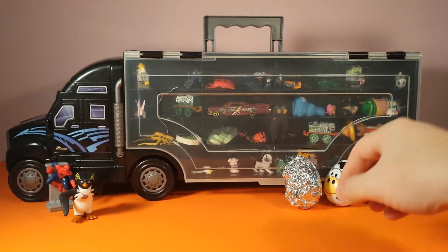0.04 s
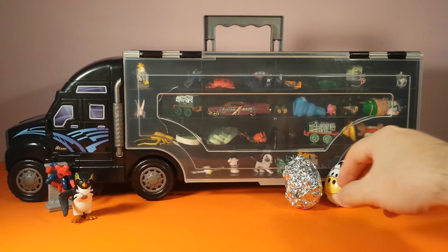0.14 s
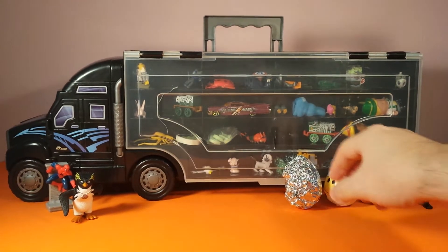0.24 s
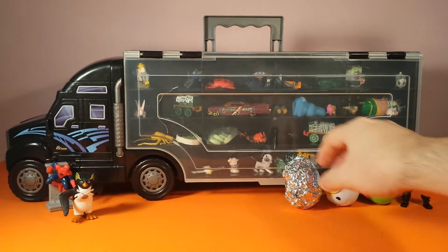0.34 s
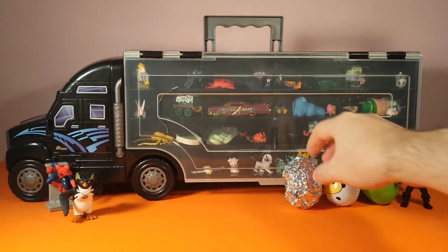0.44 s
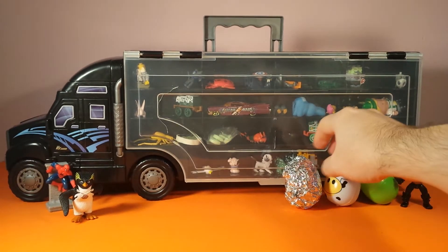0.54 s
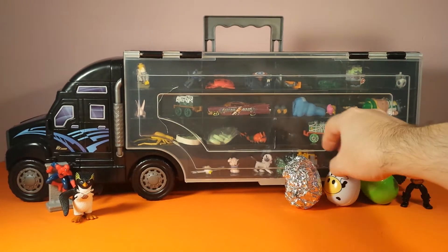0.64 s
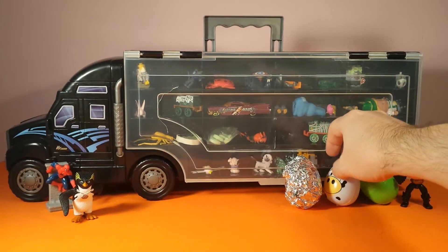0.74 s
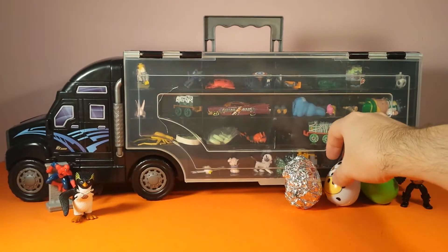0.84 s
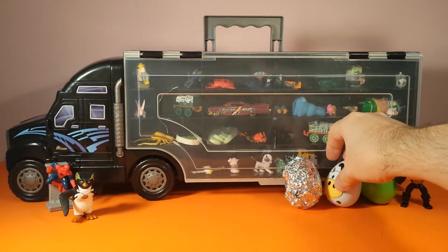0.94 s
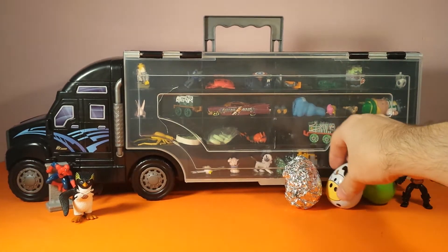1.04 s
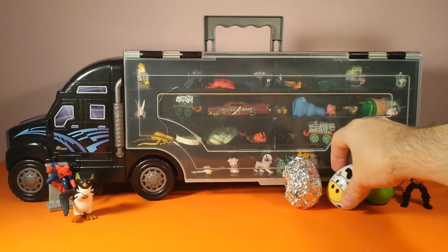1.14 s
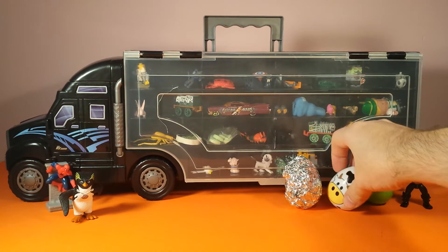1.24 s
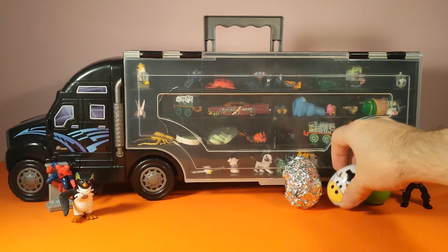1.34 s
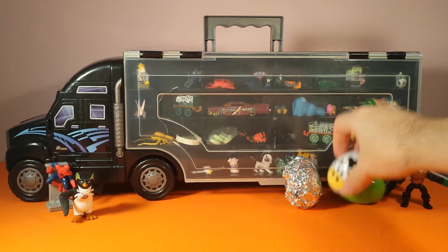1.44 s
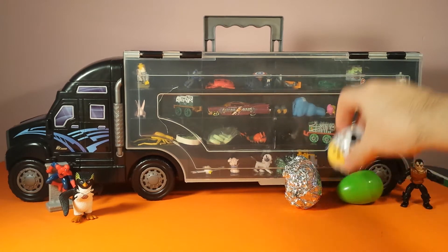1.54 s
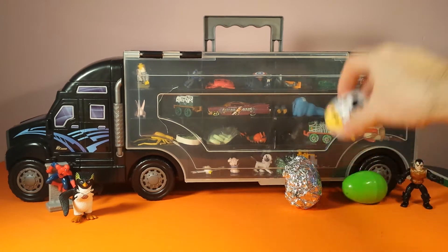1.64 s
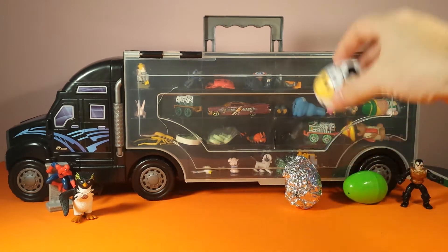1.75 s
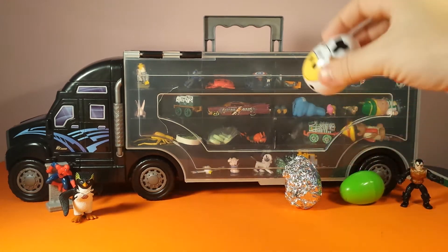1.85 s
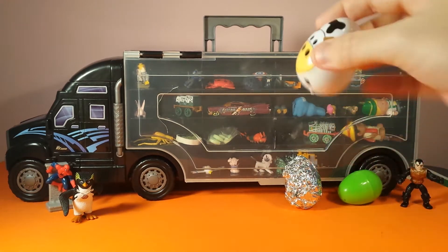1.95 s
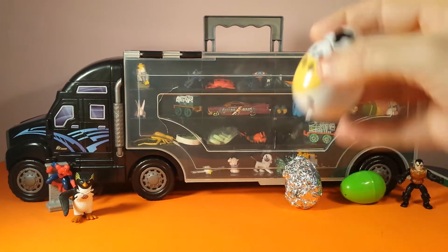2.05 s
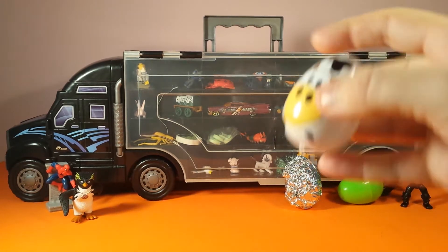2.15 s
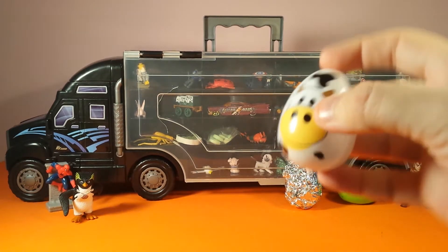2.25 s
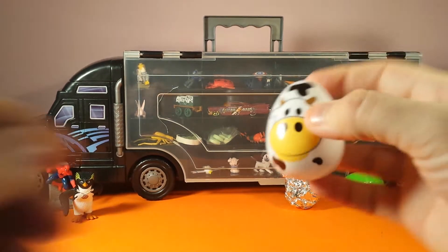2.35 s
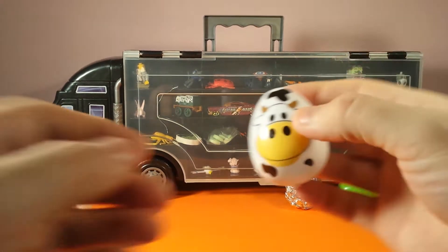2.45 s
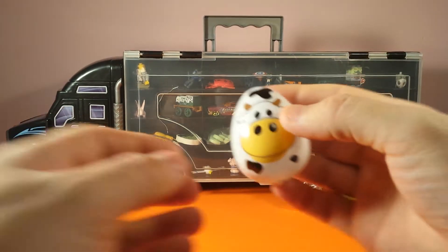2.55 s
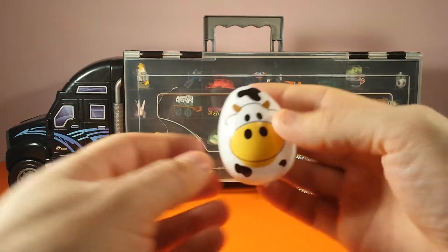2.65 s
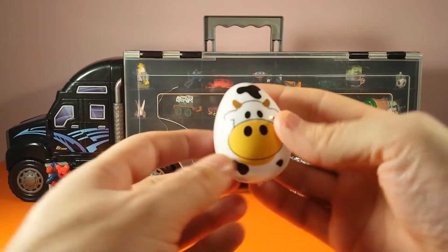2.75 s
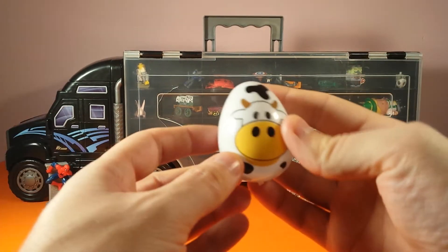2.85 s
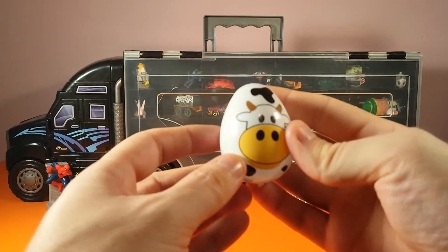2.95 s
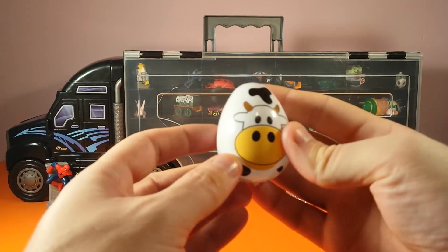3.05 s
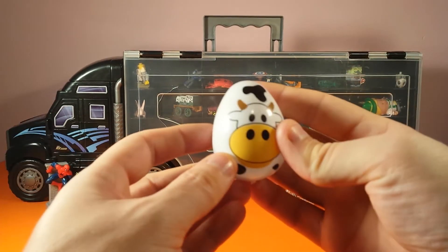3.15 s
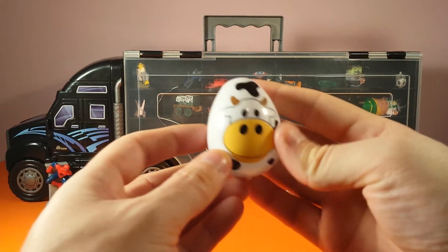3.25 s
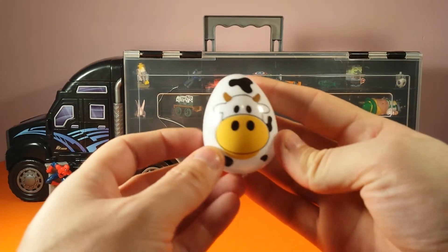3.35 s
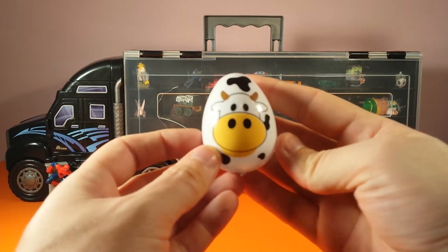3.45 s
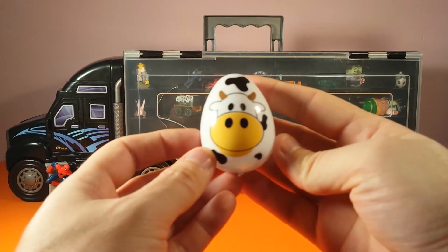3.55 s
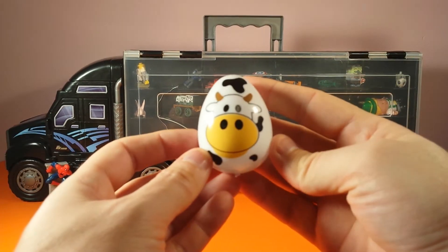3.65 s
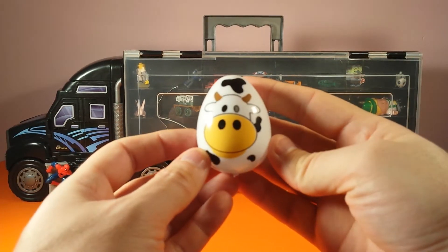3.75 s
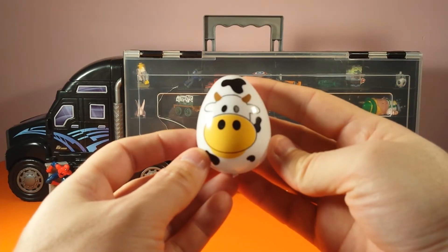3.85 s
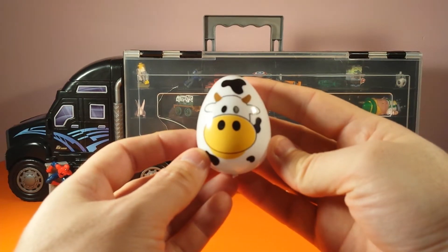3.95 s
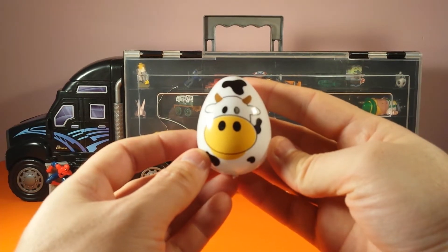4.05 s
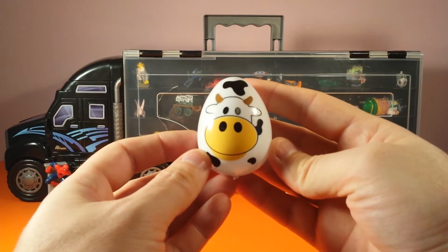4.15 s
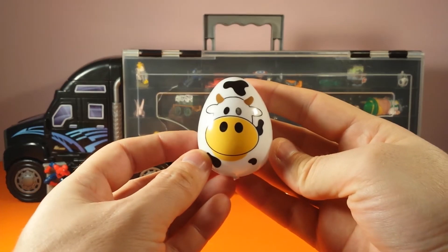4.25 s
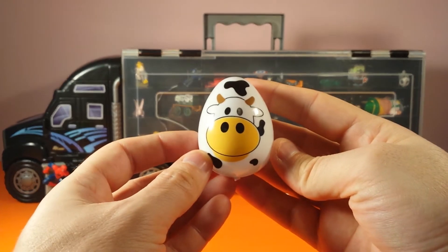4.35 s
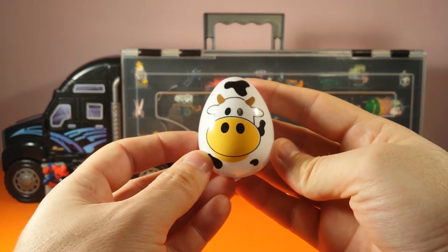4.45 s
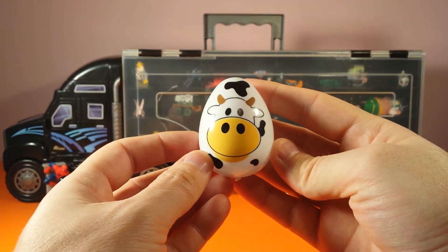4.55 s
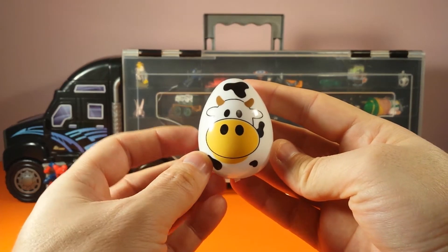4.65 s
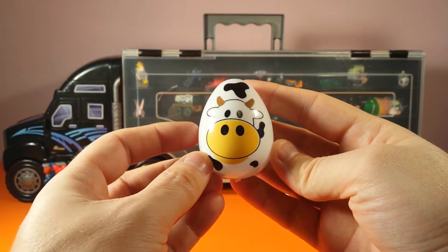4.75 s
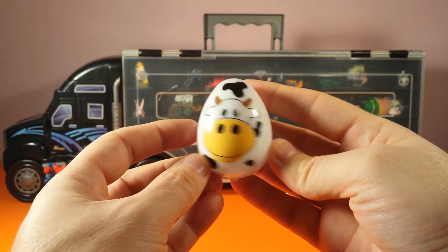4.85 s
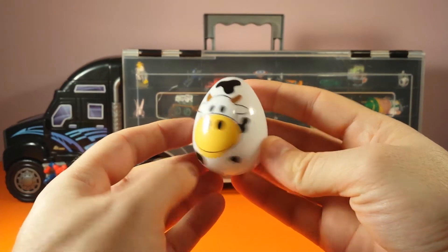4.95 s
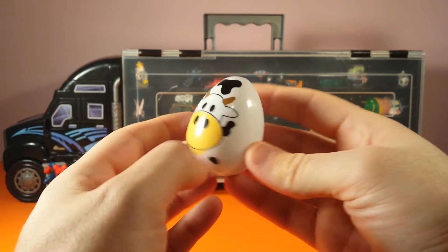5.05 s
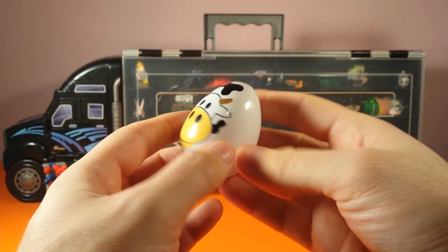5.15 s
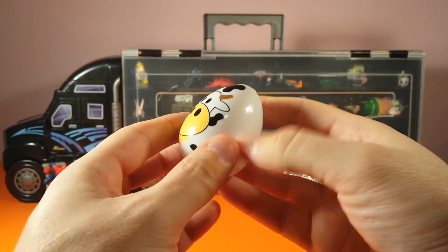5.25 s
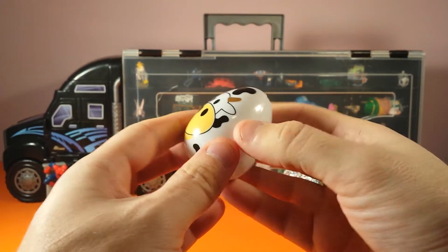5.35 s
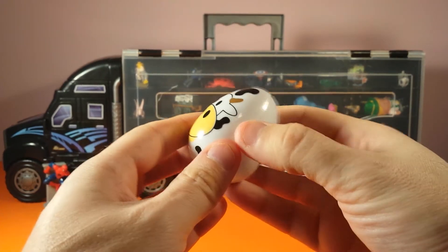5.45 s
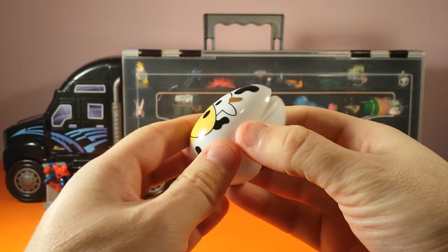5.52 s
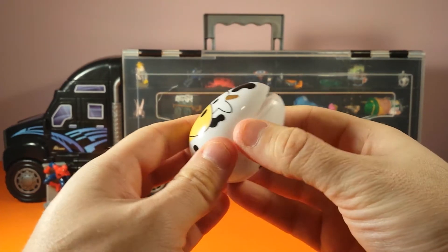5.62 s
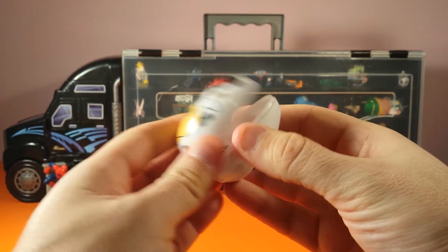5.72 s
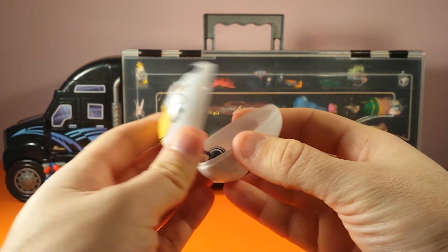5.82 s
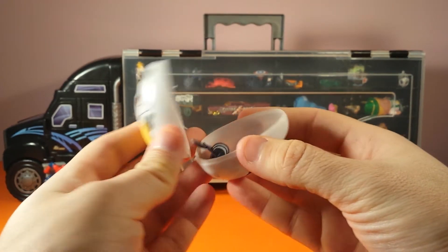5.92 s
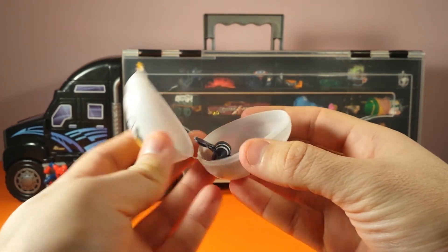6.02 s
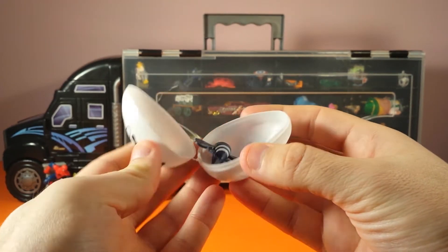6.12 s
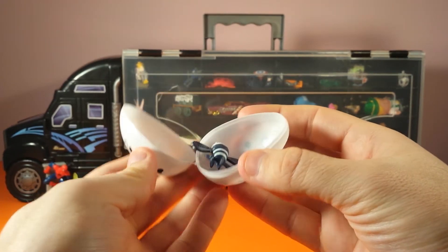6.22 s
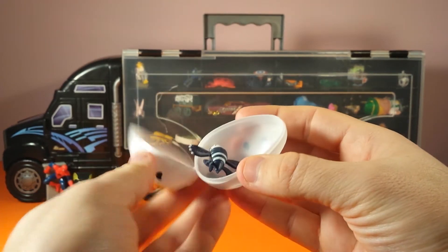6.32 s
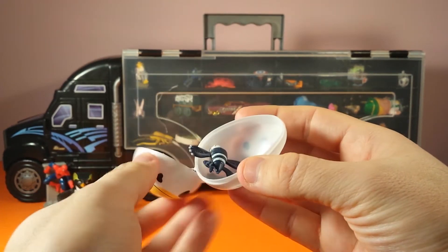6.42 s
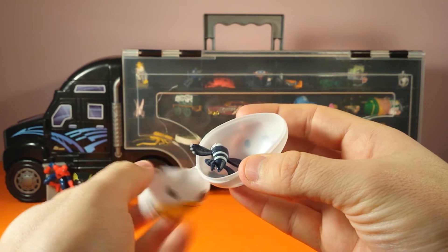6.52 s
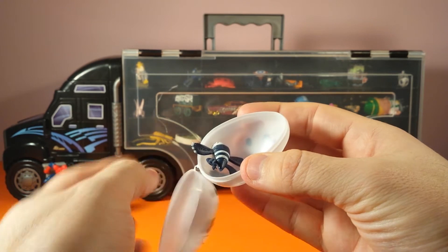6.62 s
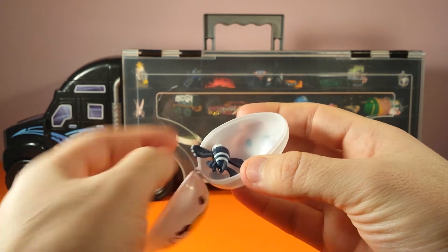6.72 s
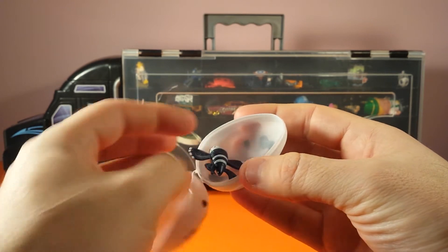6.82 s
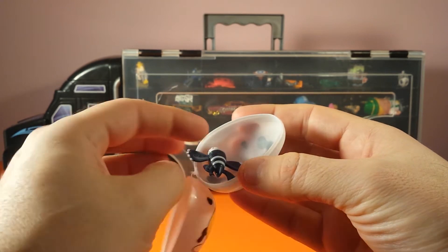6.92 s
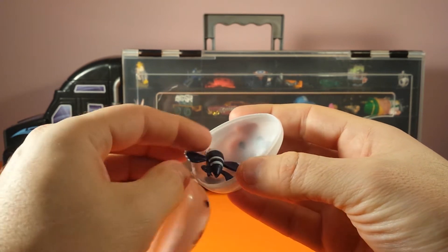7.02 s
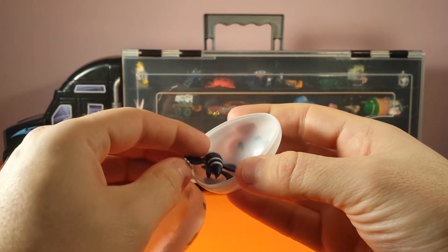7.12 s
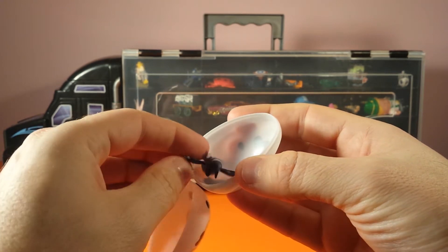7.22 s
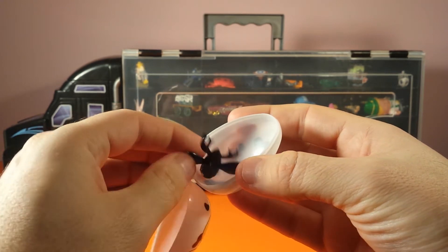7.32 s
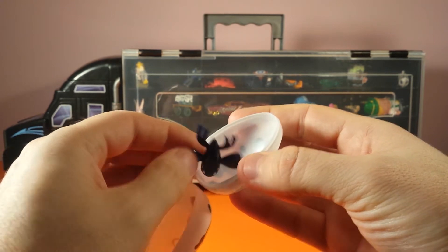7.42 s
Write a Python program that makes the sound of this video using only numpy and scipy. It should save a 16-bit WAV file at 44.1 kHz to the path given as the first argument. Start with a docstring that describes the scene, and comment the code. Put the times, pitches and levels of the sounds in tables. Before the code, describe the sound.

A plastic toy egg brushes crackly foil, clacks softly in the fingers, pops open with one crisp snap, scrapes apart and is gently rummaged.

```python
"""A plastic toy egg is picked up and opened by hand in a small quiet room, close to a stereo camera.
It scrapes past a foil-wrapped egg, knocks dully as the toy moves inside, and fingers rub and tick on it.
The catch snaps, the halves scrape apart with a rising chirp of trapped air, and the toy is fingered.
Friction is coloured noise grains and struck parts are dying sines; room tail, rumble, hiss and hum lie under."""
import sys
import numpy as np
from scipy import signal
from scipy.fft import rfft, irfft
from scipy.io import wavfile

SR = 44100
rng = np.random.default_rng(int(sys.argv[2]) if len(sys.argv) > 2 else 0)


def transcribe(signal):
    """Save signal, clipped to [-1, 1], as a 16-bit WAV file at the path in sys.argv[1]."""
    frames = np.atleast_2d(signal).T
    limited = np.clip(frames, -1, 1)
    pcm = np.round(limited * 32767).astype(np.int16)
    wavfile.write(sys.argv[1], SR, pcm)


N = 329868

# Levels are relative, ahead of placement and ports. A fall is the time to drop by a factor e.
# The catch letting go in quick slips: [t/s, level/dB]
CATCH_SLIPS = [(5.5368, -34.5), (5.5391, -14), (5.5400, -13), (5.5409, -19), (5.544, -23.5)]
# Colour of the catch's crunch: [f/Hz, level/dB]
CRACK_COLOUR = [(700, -22.5), (1500, -7.5), (2200, -7.5), (3200, -13), (4400, -10.5), (5400, 3),
                (6700, 2.5), (7900, -5.5), (9200, -4), (11500, -12), (13000, -18), (15800, -25)]
# Rim modes rung by the catch: [f/Hz, level/dB, t60/s]
CATCH_MODES = [(2100, -12, 0.0045), (4100, -18, 0.0045), (5010, -10.5, 0.0052), (5330, -4.5, 0.006),
               (6000, -5.5, .009), (6510, -3, .008), (7350, -3.5, .007), (8300, -9, .007),
               (9100, -5.5, .007), (10240, -7, .006), (11500, -10, .005), (15000, -20.5, .006)]
# The pop's start, s
POP_AT = 5.5392
# The shell's walls in the pop: [f/Hz, level/dB, t60/s]
POP_WALL_MODES = [(480, -7.5, .01), (720, -10.5, 0.016), (1148, -15.5, 0.0097), (1400, -20, 0.0086),
                  (1720, -18.5, .011)]
# The air in the egg in the pop: [f/Hz, level/dB, t60/s]
POP_AIR_MODES = [(282, -3, .014)]
# The rims scraping as the halves part: [peak t/s, level/dB, fall/s]
RIM_STROKES = [(5.752, -53.5, 0.064), (5.781, -33, 0.0077), (5.7875, -30, 0.0013), (5.795, -42, 0.022),
               (5.8052, -29, .0013), (5.8087, -24.5, 0.0013), (5.83, -58, 0.025)]
# Colour of the scraping rims: [f/Hz, level/dB]
RIM_COLOUR = [(1470, -77), (2500, -51), (2960, -17.5), (4170, -9.5), (5200, -3), (5660, -0.5), (7980, 2),
              (11400, -18), (13700, -13), (15500, -23)]
# The air between the opening halves: [t/s, resonance f/Hz, level/dB]
GAP_PATH = [(5.73, 890, -81), (5.76, 1240, -58), (5.778, 1330, -40), (5.784, 1365, -37),
            (5.789, 1620, -35.5), (5.801, 2010, -47.5), (5.812, 1920, -50), (5.82, 2100, -71)]
# Dull knocks of toy and fingers on the shell: [t/s, level/dB, pitch f/Hz, upper modes level/dB]
KNOCKS = [(.730, -52, 560, 2), (0.783, -47.5, 570, 1.5), (.932, -62, 574, -12), (1.011, -67, 560, -10),
          (1.071, -48.5, 507, -3.5), (1.3777, -43, 583, -2), (1.401, -48, 537, -14),
          (1.4294, -50.5, 580, 6), (1.449, -51.5, 570, -5), (1.473, -50.5, 583, 8), (1.49, -57, 506, 8),
          (1.5349, -44.5, 603, 7.5), (1.543, -47, 583, -11), (1.571, -73, 580, 7), (2.0008, -46, 577, 7.5),
          (2.497, -48, 602, -2.5), (2.711, -58.5, 668, 4.5), (2.914, -57.5, 535, 1), (3.075, -60, 570, -12),
          (3.173, -58, 485, 0), (3.236, -58.5, 440, 2), (5.377, -69, 631, -9), (6.3288, -47.5, 530, 1)]
# Shell modes of a knock: [ratio to the pitch, level/dB, t60/s]
KNOCK_MODES = [(.55, -4.5, 0.025), (.86, -3, 0.042), (1.03, -0.5, 0.041), (1.2, -5, 0.026),
               (1.65, -8.5, 0.0185), (2.1, -10.5, 0.0167), (3.2, -32, 0.025)]
# Soft bumps of the hand: [t/s, level/dB, f/Hz, t60/s]
BUMPS = [(1.602, -46.5, 76, 0.076), (1.663, -61, 110, 0.13), (5.712, -47, 114.8, 0.025),
         (6.33, -41, 226, 0.061), (6.388, -61, 280, 0.04)]
# Sharp ticks of nail and seam: [t/s, level/dB, fall/s]
TICKS = [(.7832, -36, 0.00056), (1.067, -52.5, 0.0019), (1.309, -54, .004), (1.38, -54, 0.0019),
         (1.422, -49.5, .0043), (3.1535, -54, 0.0024), (3.289, -46, 0.00087), (4.9737, -48.5, 0.0021),
         (5.7208, -37, 0.00085), (6.2802, -52, 0.001), (6.6035, -51.5, 0.0041), (6.6478, -52.5, 0.0036),
         (6.7195, -32.5, 0.00085)]
# Colour of the ticks: [f/Hz, level/dB]
TICK_COLOUR = [(880, -51), (1500, -41), (2640, -24), (3120, -3), (3580, -10), (4800, 4), (6500, 12.5),
               (9890, -6.5), (13500, 0), (15500, -23)]
# Ticks where the shell is free to ring: [t/s, level/dB, pitch f/Hz]
PINGS = [(3.1512, -41.5, 5760), (4.9737, -54, 4760)]
# Modes of the freely ringing shell: [ratio to the pitch, level/dB, t60/s]
PING_MODES = [(0.688, -22, 0.045), (.91, -2.5, 0.014), (.99, -3.5, 0.054), (1.02, -4, 0.044),
              (1.63, -10.5, 0.031)]
# How much the grip is shifting; it drives murmur, hiss and camera shake: [t/s, level/dB]
GRIP = [(0, -67), (.45, -64), (.6, -78), (1.3, -73.5), (1.5, -64), (1.75, -76), (2.8, -77), (3.2, -70),
        (3.75, -68.5), (4.2, -76.5), (4.35, -92.5), (5.2, -81.5), (6.25, -82), (6.39, -69.5), (6.9, -80.5),
        (7.3, -76), (7.47, -95)]
GRIP_MURMUR_DB, GRIP_HISS_DB, GRIP_SHAKE_DB = 0.4, -3, -7
# A finger sliding on the shell, quick to start and slow to stop: [peak t/s, level/dB, fall/s]
SLIDES = [(1.135, -63, 0.023), (1.54, -63, 0.68), (2.11, -61, 0.18), (2.26, -69, 0.9), (2.805, -62, .035),
          (3.31, -61, 0.12), (3.535, -60, 0.022), (4.065, -67, 0.061), (4.22, -64.5, 0.074),
          (4.68, -72, 0.14), (4.935, -64, .02), (5.03, -63.5, 0.017), (5.125, -61.5, 0.062),
          (5.24, -67.5, 0.21), (5.37, -66.5, 0.049), (5.89, -63, 0.064), (6.145, -69, 0.032),
          (6.415, -62, 0.064), (6.48, -62, 0.065), (6.78, -70, 0.21)]
# Heaves of the whole hand: [peak t/s, shell level/dB, camera shake level/dB, fall/s]
HEAVES = [(.16, -62, -69, 0.037), (.31, -66, -67, 0.062), (1.57, -78, -55, .08), (3.73, -72, -73, 0.088),
          (5.76, -50.5, -54.5, 0.042), (6.52, -87, -73, 0.064)]
# A fingertip squeaking on the glossy shell: [peak t/s, level/dB, fall/s]
SQUEAKS = [(3.9, -77, 0.035)]
# Colour of the skin's hiss: [f/Hz, level/dB]
SKIN_COLOUR = [(700, -24.5), (1200, -11.5), (2200, -14), (3500, -6.5), (4500, -3.5), (5600, -0.5),
               (7000, 3), (8300, 0), (10000, -7.5), (13000, -9), (15500, -9.5)]
# Colour of the hollow egg's murmur: [f/Hz, level/dB]
HOLLOW_COLOUR = [(59, -28.5), (100, -0.5), (222, -1.5), (345, -7.5), (421, -7.5), (723, -12), (810, -16),
                 (1280, -19), (3000, -21), (3900, -34), (6600, -120)]
# The seam and hinge flexing: [peak t/s, level/dB, fall/s]
HINGE_STROKES = [(.7835, -50.5, 0.0021), (2.001, -56.5, 0.0043), (2.497, -76, .004), (4.881, -64.5, .003),
                 (4.974, -61.5, .0028), (6.199, -70, .004), (6.22, -69, .004), (6.27, -60.5, 0.0026),
                 (6.3285, -53.5, 0.0052), (6.345, -64.5, 0.02), (6.7198, -60, 0.0028)]
# Colour of seam and hinge, and of the grit in a knock: [f/Hz, level/dB]
HINGE_COLOUR = [(200, 7), (400, -2), (900, -9), (1400, 3), (2000, 0), (2700, -0.5), (3500, -10),
                (8000, -17.5)]
# Fingers scuffing the toy in the open shell: [peak t/s, level/dB, fall/s]
TOY_STROKES = [(6.468, -62, .008), (6.49, -73, 0.014), (6.604, -58.5, 0.0068), (7.12, -64.5, 0.024),
               (7.213, -63, .017), (7.277, -56.5, 0.028), (7.332, -59.5, 0.0087), (7.353, -60, .013)]
# Colour of the scuffed toy: [f/Hz, level/dB]
TOY_COLOUR = [(290, -29), (500, -1), (544, -3), (815, 2.5), (1570, -1), (2480, -2.5), (2740, -12.5),
              (7580, 5.5), (10200, -8), (14000, -6.5)]
# The egg brushing the foil: [peak t/s, level/dB, fall/s]
FOIL_STROKES = [(.01, -53.5, 0.022), (.095, -51, 0.03), (.155, -31.5, 0.011), (.2, -38.5, 0.018),
                (.241, -33, 0.013), (.254, -33, 0.011), (.29, -51, .03), (.502, -56.5, 0.023),
                (.675, -60.5, 0.024), (.79, -63, 0.028), (1.565, -62.5, 0.022)]
# The foil catching and letting go: [peak t/s, level/dB, fall/s]
FOIL_SNAGS = [(.3555, -38.5, 0.011), (.481, -55, 0.01), (.651, -56.5, .05)]
# Colour of the foil's crinkle: [f/Hz, level/dB]
FOIL_COLOUR = [(120, -15), (250, -14), (400, -14), (540, -6.5), (650, -11.5), (780, -9), (1000, -12.5),
               (2600, -6.5), (4200, -7), (6400, 2), (9300, -8), (13000, -15.5), (15500, -19.5)]
# Thin resonances of the foil: [f/Hz, width/Hz, level/dB]
FOIL_RINGS = [(4200, 22, -19.5), (4937, 35, -19), (5880, 27, -12.5), (6400, 25, -15), (6800, 200, -22)]
# Decay of the room: [f/Hz, t60/s]
ROOM_T60 = [(100, .5), (260, 0.5), (700, 0.27), (1840, 0.28), (4850, 0.29), (12800, 0.39)]
# Colour of the room: [f/Hz, level/dB]
ROOM_COLOUR = [(100, 1), (260, -2.5), (420, 3.5), (700, -5.5), (1050, 4.5), (1700, -3), (3000, 1),
               (4600, -2), (6500, -5), (14000, -4)]
# Room tail between the ports: [f/Hz, left-right likeness]
ROOM_LIKENESS = [(100, 1), (500, 0.42), (1200, 0.71), (2500, 0.062), (15000, 0)]
# Tone balance of the microphone ports: [f/Hz, left minus right level/dB]
PORT_BALANCE = [(200, 0.5), (3000, 2), (5200, -0.5), (6000, 7), (6450, 5), (7100, -2), (8100, -7),
                (11500, -9.5), (15000, 0.5)]
# Colour of still air and microphone hiss: [f/Hz, level/dB]
FLOOR_COLOUR = [(12, -30), (20, -8.5), (133, -8.5), (187, -15.5), (335, -17.5), (375, -20.5), (1390, -27.5),
                (1510, -28), (1890, -29.5), (2430, -27.5), (2800, -29), (4250, -28), (8090, -28),
                (10400, -30), (15800, -35)]
# Air and hiss between the ports: [f/Hz, left-right likeness]
FLOOR_LIKENESS = [(30, 1), (200, 0.43), (700, 0), (2000, 0.07), (5000, .1), (15000, 0.11)]

TIME, HZ = np.arange(N) / SR, np.fft.rfftfreq(N, 1 / SR)
BRIEF = TIME[:SR // 4]  # time axis of one struck sound


def amp(db):
    """Turns decibels into gain."""
    return 10 ** (np.asarray(db) / 20)


def unit(x):
    """Scales to rms 1."""
    return x / np.sqrt(np.mean(x ** 2) + 1e-20)


def read(points, hz):
    """Reads a table along a log-frequency axis."""
    f, value = np.transpose(points)
    return np.interp(np.log(hz + 1), np.log(f + 1), value)


def add(mix, s, sound):
    """Lays a sound into the mix at time s."""
    part = mix[max(round(s * SR), 0):][:len(sound)]
    part += sound[:len(part)]


def colour(x, spectrum, size=8192):
    """Minimum-phase filter with the given spectrum; white noise keeps its level."""
    gain = unit(amp(read(spectrum, abs(np.fft.fftfreq(size, 1 / SR)))))
    log_gain = np.log(np.maximum(gain, 1e-4))
    taps = np.fft.ifft(np.exp(np.conj(signal.hilbert(log_gain)))).real[:size // 2]
    return signal.oaconvolve(np.atleast_2d(x), taps[None], axes=1)[:, :N]


def resonate(x, hz, width):
    """A resonance that can follow a moving frequency: shift down, smooth, shift back up."""
    turn = np.exp(2j * np.pi * np.cumsum(hz * np.ones(N)) / SR)
    r = np.exp(-np.pi * width / SR)
    return (turn * signal.lfilter([1 - r], [1, -r], x / turn)).real


def ring(modes, rise=1e-5):
    """Dying sines of a struck object; neighbouring modes swing in opposite directions."""
    swings = np.zeros(len(BRIEF))
    for k, (hz, db, t60) in enumerate(modes):
        swings += (-1) ** k * amp(db - 60 * BRIEF / t60) * np.sin(2 * np.pi * hz * BRIEF)
    return swings * (1 - np.exp(-BRIEF / rise))


def grains(per_s, spread_db, wander_ms=0.039):
    """Friction: tiny slips of uneven size, each at its own spot and so with its own lag between the ports."""
    size = amp(spread_db * np.minimum(rng.exponential(1, N), 4)) * rng.choice([-1, 1], N)
    left = size * (rng.random(N) < per_s / SR)
    lag = np.round(rng.standard_normal(N) * wander_ms * SR / 1000).astype(int)
    right = np.bincount(np.clip(np.arange(N) + lag, 0, N - 1), left, N)
    return unit(np.array([left, right]))


def strokes(rows, rise_share):
    """Pressure of strokes, each swelling to its peak in a share of the time it takes to die away."""
    power = np.zeros(N)
    for s, db, fall in rows:
        distance = np.maximum((s - TIME) / rise_share, TIME - s)
        power += (amp(db) * np.exp(-distance / fall)) ** 2
    return np.sqrt(power)


def level(curve):
    """Gain along a curve of time and level."""
    return amp(np.interp(TIME, *np.transpose(curve), left=-120))


def pair(x, likeness):
    """Makes two unrelated channels as alike as the table says."""
    a, b = rfft(x)
    same = np.clip(read(likeness, HZ), -1, 1)
    return irfft(np.array([a, same * a + np.sqrt(1 - same ** 2) * b]), N)


def place(x, lead_ms, pan_db, shade_db):
    """Sets port delay, balance and the camera body's treble shading; positive values favour the left."""
    side_db = pan_db + shade_db * np.clip(HZ / 5000 - 1, 0, 1)  # shading grows from 5 to 10 kHz
    half_lead = np.exp(1j * np.pi * HZ * lead_ms / 1000) * amp(side_db / 2)
    return irfft(rfft(x) * np.array([half_lead, 1 / half_lead]), N)


def snap(pop_rise_s=.0025, leak_hz=130, crunch_db=-3, catch_db=-9.0, slip_s=0.0014):
    """The catch slips over its lip and rings the rim; the released shell pumps the air in one hollow pop."""
    crunch, rim, pop = np.zeros((2, N)), np.zeros(N), np.zeros(N)
    burst = np.exp(-BRIEF / slip_s)
    for s, db in CATCH_SLIPS:
        add(rim, s, amp(db + catch_db) * ring(CATCH_MODES))
        for port in crunch:
            add(port, s, amp(db + crunch_db) * burst * rng.choice([-1, 1], len(BRIEF)))
    add(pop, POP_AT, -ring(POP_AIR_MODES, rise=pop_rise_s) - ring(POP_WALL_MODES, rise=pop_rise_s))
    # so small a shell radiates no deep bass
    pop = signal.sosfilt(signal.butter(1, leak_hz, "high", fs=SR, output="sos"), pop)
    return colour(crunch, CRACK_COLOUR) + pop, rim


def parting(width_hz=110, smear=0.47):
    """The rims scrape; the air between the halves rings higher overall as the gap widens."""
    s, hz, db = np.transpose(GAP_PATH)
    pitch = np.interp(TIME, s, hz)
    air = unit(resonate(rng.standard_normal(N), pitch, width_hz))
    air = unit(air / (smear + abs(signal.hilbert(air))))  # evens out the noise's swells
    chirp = air * amp(np.interp(TIME, s, db, left=-120, right=-120))
    scrape = grains(per_s=8400, spread_db=1.5) * strokes(RIM_STROKES, rise_share=0.44)
    return colour(scrape, RIM_COLOUR) + chirp


def knocks(contact_db=-18.5, contact_s=.004):
    """Knocks ring the damped shell, each with its own pitch and upper-mode level; the hand bumps softly."""
    out, grit = np.zeros((2, N))
    for s, db, hz, upper_db in KNOCKS:
        modes = [(hz * ratio, mode_db + upper_db * (k > 3), t60)
                 for k, (ratio, mode_db, t60) in enumerate(KNOCK_MODES)]
        add(out, s, amp(db) * ring(modes, rise=0.00062))
        contact = np.exp(-BRIEF / contact_s) * rng.standard_normal(len(BRIEF))
        add(grit, s, amp(db + contact_db + upper_db / 2) * contact)
    for s, db, hz, t60 in BUMPS:
        add(out, s, ring([(hz, db, t60)], rise=0.00072))
    return out + colour(grit, HINGE_COLOUR)


def ticks():
    """Tiny cracks, scattered briefly by the cupped hands, and pings where the shell is free to ring."""
    cracks, pings = np.zeros((2, N)), np.zeros(N)
    scatter = amp(-15) * np.exp(-BRIEF / .004)
    for s, db, fall in TICKS:
        crack = np.exp(-BRIEF / fall) * rng.choice([-1, 1], len(BRIEF))
        for port in cracks:
            add(port, s, amp(db) * (crack + scatter * rng.standard_normal(len(BRIEF))))
    for s, db, hz in PINGS:
        modes = [(hz * ratio, mode_db, t60) for ratio, mode_db, t60 in PING_MODES]
        add(pings, s, amp(db) * ring(modes))
    return colour(cracks, TICK_COLOUR) + pings


def fingers(flutter_db=2.7, glance_s=0.045, squeak_hz=5100, squeak_width_hz=120):
    """Skin hisses unevenly over the shell and squeaks once; the hollow egg murmurs with each shift of grip."""
    glance = np.hanning(round(glance_s * SR))
    flutter = unit(signal.oaconvolve(rng.standard_normal(N), glance, "same"))
    pressure = amp(flutter_db * flutter)
    sliding = np.hypot(amp(GRIP_HISS_DB) * level(GRIP), strokes(SLIDES, rise_share=.27))
    heaves = strokes([(s, db, fall) for s, db, _, fall in HEAVES], rise_share=.55)
    shifting = np.hypot(amp(GRIP_MURMUR_DB) * level(GRIP), heaves)
    hiss = colour(grains(per_s=14000, spread_db=1.5, wander_ms=0.11) * sliding * pressure, SKIN_COLOUR)
    murmur = colour(grains(per_s=1200, spread_db=3) * shifting, HOLLOW_COLOUR)
    squeak = unit(resonate(rng.standard_normal(N), squeak_hz, squeak_width_hz))
    return hiss + murmur + squeak * strokes(SQUEAKS, rise_share=1)


def toy():
    """The seam and hinge creak, and fingertips scuff the toy against the open shell."""
    creaks = grains(per_s=14000, spread_db=-3) * strokes(HINGE_STROKES, rise_share=0.14)
    scuffs = grains(per_s=6200, spread_db=3.5) * strokes(TOY_STROKES, rise_share=0.21)
    return colour(creaks, HINGE_COLOUR) + colour(scuffs, TOY_COLOUR)


def foil():
    """Crinkles of the foil catch on the passing egg and set a few thin resonances going."""
    brushing = strokes(FOIL_STROKES, rise_share=0.84)
    snagging = strokes(FOIL_SNAGS, rise_share=0.05)
    slips = grains(per_s=6000, spread_db=3.5, wander_ms=0.034) * np.hypot(brushing, snagging)
    rings = np.zeros((2, N))
    for hz, width, db in FOIL_RINGS:
        makeup = np.sqrt(2 * SR / (np.pi * width))  # narrow rings pass less of the noise
        rings += amp(db) * makeup * resonate(slips, hz, width)
    return amp(1.5) * (colour(slips, FOIL_COLOUR) + rings)


def rumble(top_hz=70):
    """The hand's weight on the table shakes the camera, each port differently."""
    band = signal.butter(3, [15, top_hz], "band", fs=SR, output="sos")
    shake = signal.sosfilt(band, rng.standard_normal((2, N)))
    heaves = strokes([(s, db, fall) for s, _, db, fall in HEAVES], rise_share=1.2)
    weight = np.hypot(amp(GRIP_SHAKE_DB) * level(GRIP), heaves)
    return unit(shake) * weight * amp([[-2], [1]])


def room(x, gap_s=.007, build_s=.012):
    """Walls return a diffuse tail that builds up a moment after the direct sound."""
    echoes = rng.choice([-1., 1.], (2, N)) * (rng.random((2, N)) < 1 / 10)
    hz, t, z = signal.stft(pair(echoes, ROOM_LIKENESS)[:, :SR], SR, nperseg=256)
    decay = amp(-60 * t / read(ROOM_T60, hz)[:, None])
    tail = signal.istft(z * decay, SR, nperseg=256)[1][:, :SR]
    tail = tail * np.clip((TIME[:SR] - gap_s) / build_s, 0, 1)
    wet = signal.fftconvolve(x, tail / np.linalg.norm(tail[0]), axes=1)[:, :N]
    return irfft(rfft(wet) * amp(read(ROOM_COLOUR, HZ)), N)


def background(floor_db=-71, hum_hz=119, hum_db=-79):
    """Still air and microphone hiss as one coloured noise, with a wavering low hum."""
    air = colour(pair(rng.standard_normal((2, N)), FLOOR_LIKENESS), FLOOR_COLOUR)
    waver = unit(resonate(rng.standard_normal(N), hum_hz, 3.4))
    hum = unit(np.sin(2 * np.pi * hum_hz * TIME) + .6 * waver)
    return amp(floor_db) * air + amp(hum_db) * hum


def scene():
    """The egg starts by the foil on the table, is lifted to the microphones and opened with its rim facing them."""
    brushed = foil()
    popping, rim = snap()
    scraping = parting()
    handled = fingers() + knocks() + ticks() + toy()
    lifted = np.interp(TIME, [1.7, 3.0], [0, 1])
    low, held = handled * (1 - lifted), handled * lifted
    direct = place(brushed, lead_ms=-0.24, pan_db=2.5, shade_db=-3.0)
    direct += place(popping + rim + scraping, lead_ms=0.094, pan_db=-1.0, shade_db=-3.0)
    direct += place(low, lead_ms=-0.098, pan_db=1, shade_db=1.5)
    direct += place(held, lead_ms=0.043, pan_db=0.0, shade_db=0)
    send = amp(-5.0) * brushed + amp(-6) * low + amp(-6.5) * held
    send = send + amp(-10.5) * popping + amp(-19) * rim + amp(-12.5) * scraping
    walls = room(send)
    ports = amp(read(PORT_BALANCE, HZ) * np.array([[.5], [-.5]]))  # each port has its own treble resonance
    ports = ports / np.sqrt(np.mean(ports ** 2, axis=0))
    return irfft(rfft(direct + walls) * ports, N) + rumble() + background()


def record(dry, edge_hz=15750):
    """Band limit: a steep low-pass takes off the top treble."""
    taps = signal.firwin(511, edge_hz, window=("kaiser", 9), fs=SR)
    return signal.oaconvolve(dry, taps[None], "same")


dry = scene()
out = record(dry)
transcribe(out)
```